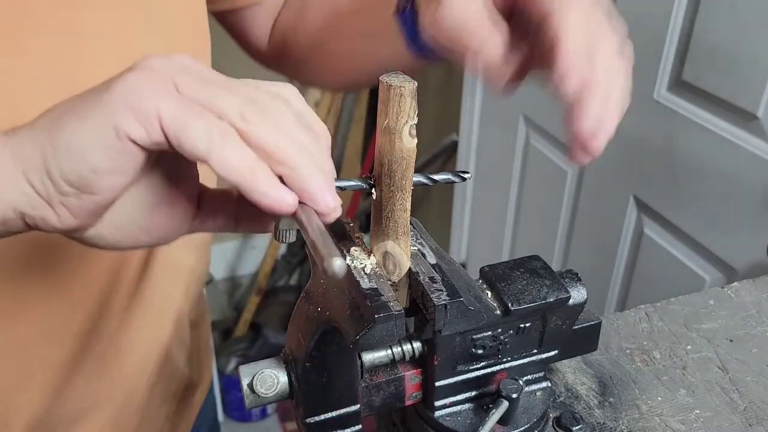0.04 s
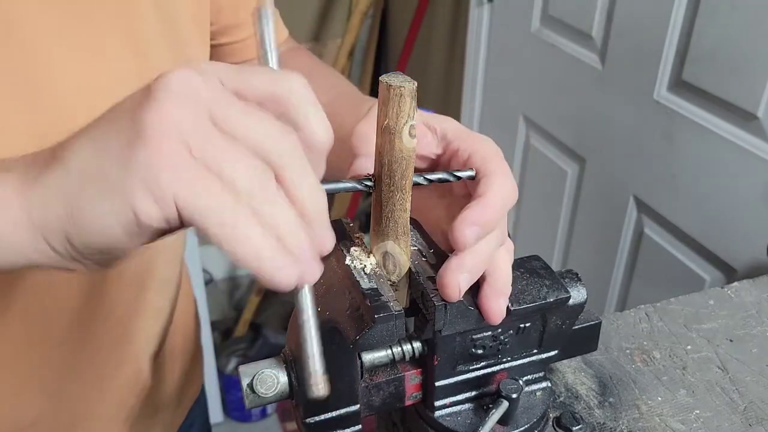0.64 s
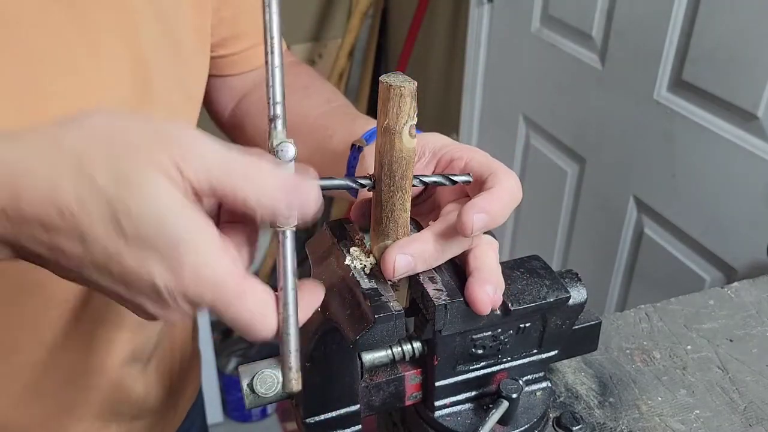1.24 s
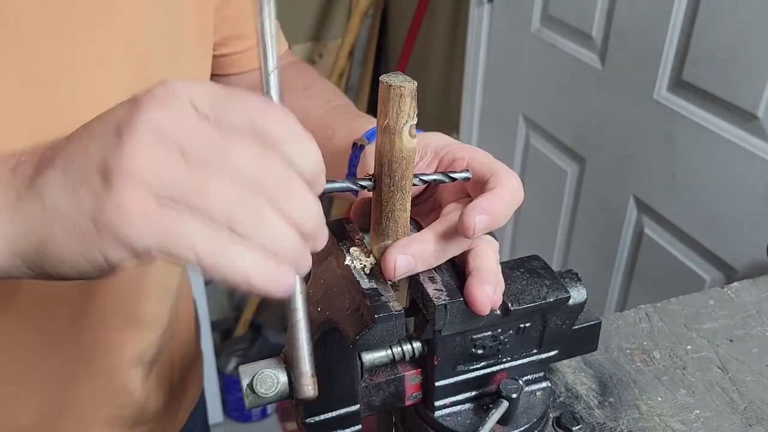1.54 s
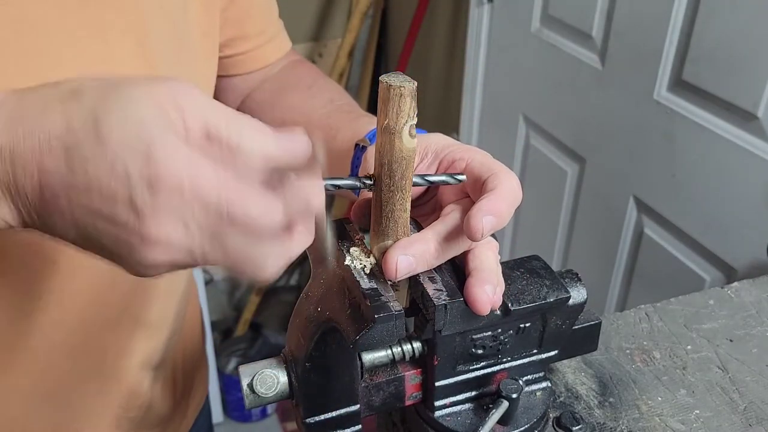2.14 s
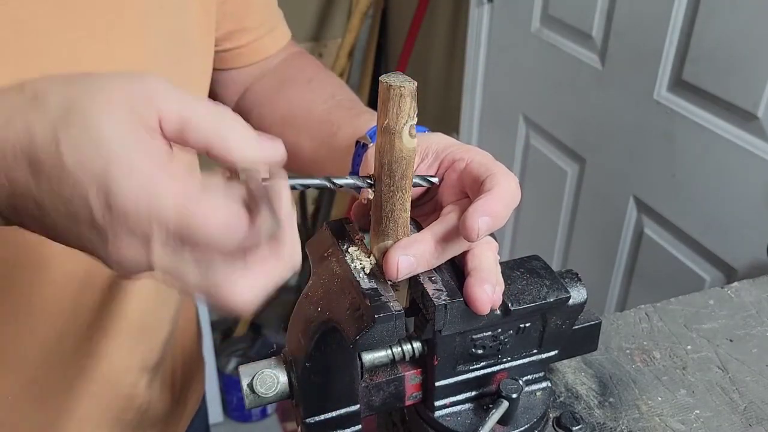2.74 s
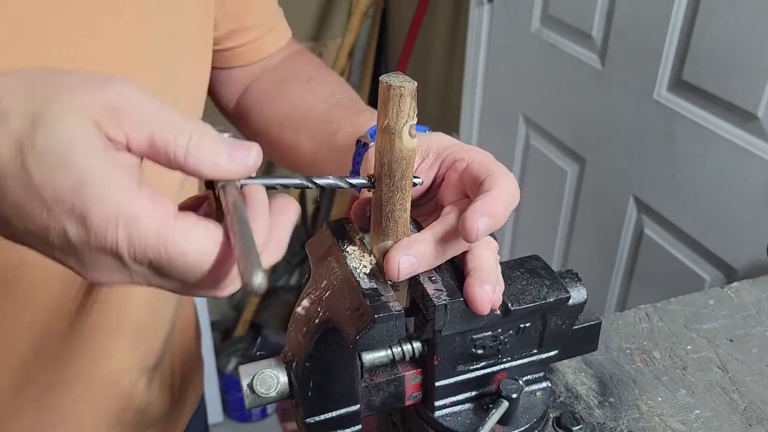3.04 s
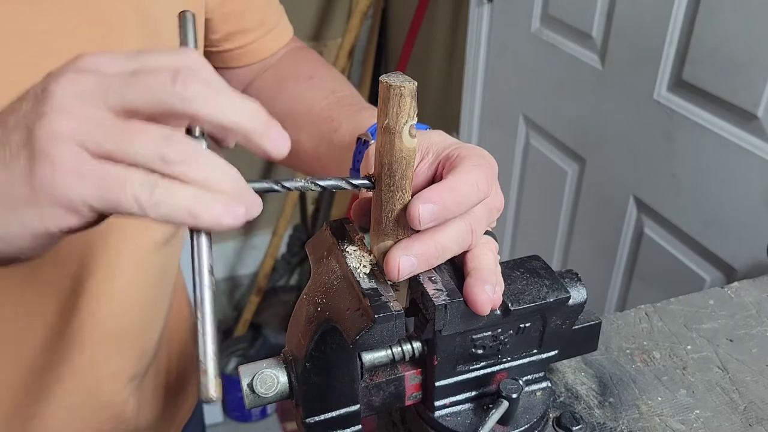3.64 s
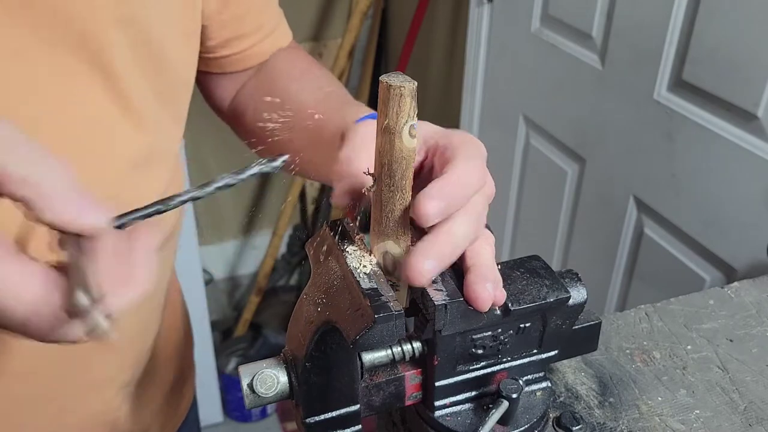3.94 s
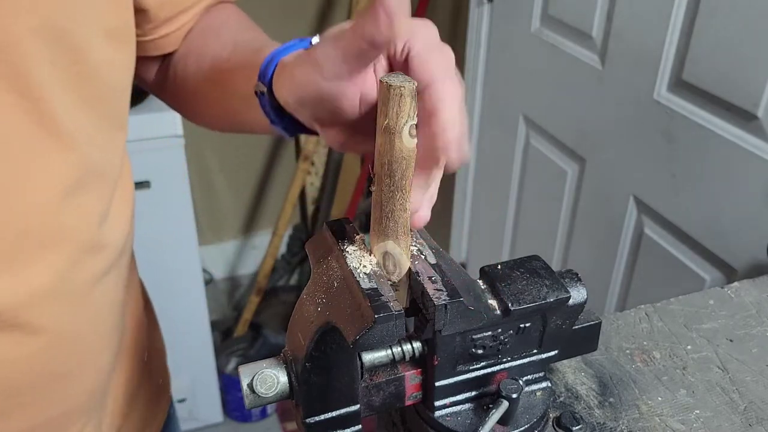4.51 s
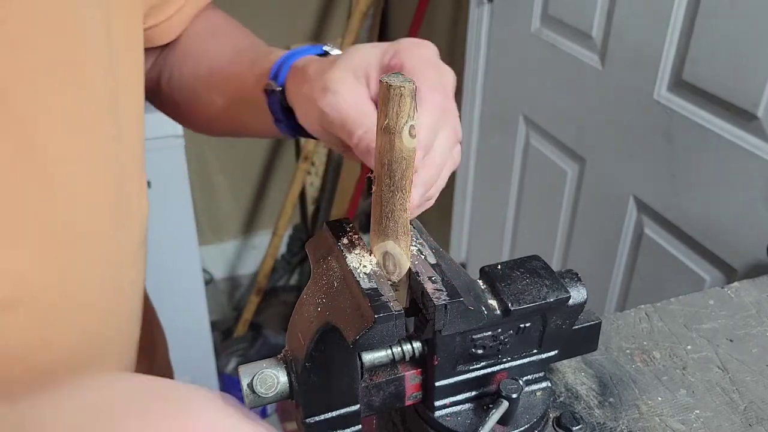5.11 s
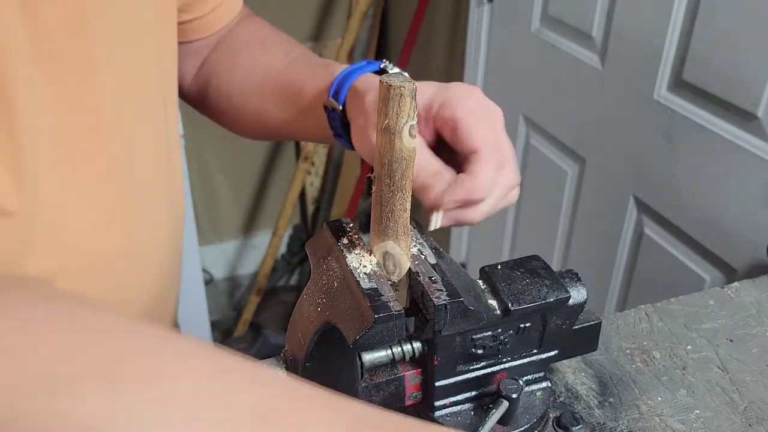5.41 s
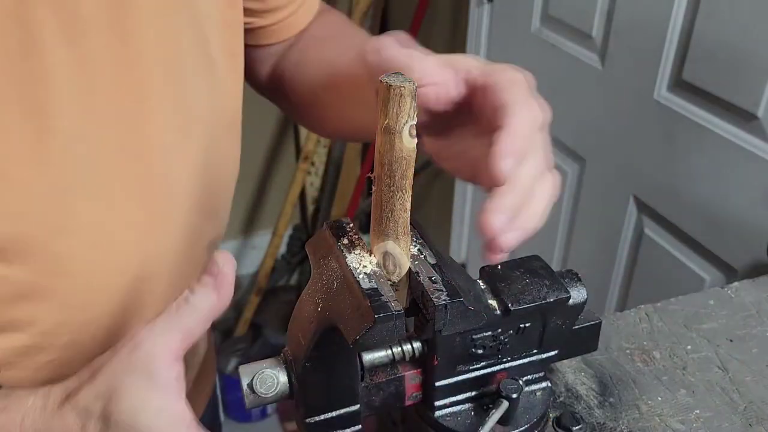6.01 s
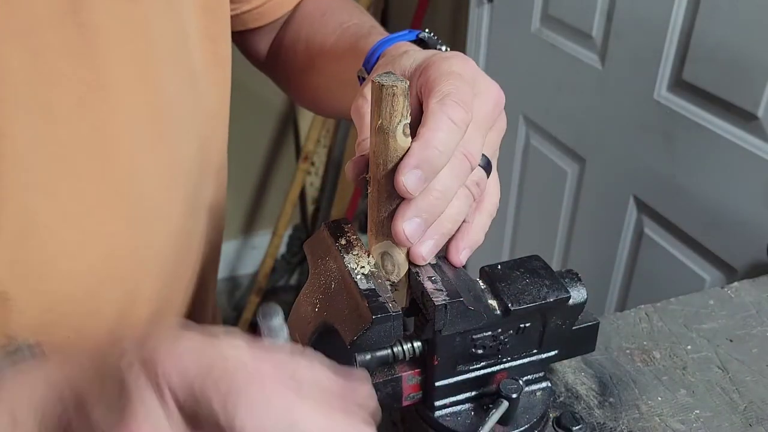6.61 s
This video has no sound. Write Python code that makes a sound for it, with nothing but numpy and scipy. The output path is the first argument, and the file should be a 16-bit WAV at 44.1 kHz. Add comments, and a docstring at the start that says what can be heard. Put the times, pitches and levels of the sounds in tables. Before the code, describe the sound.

Rhythmic gritty scrapes and short wooden groans of hand drilling, followed by small ticks, a loud clunk on a workbench and a metal clink.

```python
"""A twist bit turned by hand through a stick in a vise, close to a stereo pair in a small workshop.
At each turn the flutes scrape and snap fibres, and the bit sticks and slips so that the wood groans
and creaks. The bit slides out, chips tick and fingers brush off the dust. The steel tool is put down
on the bench with a knock that ducks the gain, then the bar of the vise drops with a clink.
Rustling hands, the low boom of the swaying bench and quiet room tone lie underneath."""
import sys
import numpy as np
from scipy import signal
from scipy.fft import rfft, irfft
from scipy.io import wavfile
from scipy.ndimage import uniform_filter1d

SR = 44100
rng = np.random.default_rng(int(sys.argv[2]) if len(sys.argv) > 2 else 0)


def materialize(psi):
    """Save the field psi as 16-bit PCM at rate SR to the path in sys.argv[1].

    A 1-D psi becomes a single channel; in a 2-D psi each row is a channel.
    """
    bounded = np.clip(np.atleast_2d(psi).T, -1, 1)
    quanta = np.round(bounded * 32767).astype(np.int16)
    wavfile.write(sys.argv[1], SR, quanta)


N = 298116
T = np.arange(N) / SR

# turns of the handle: t/s, half-length/s, scrape/dB, groan/dB, groan f/Hz, push on the bench/dB
TURNS = [(0.217, 0.023, -47.5, -35.5, 222.2, -25.5), (0.723, 0.018, -51, -38.5, 209.6, -27),
         (1.188, 0.019, -56, -33.5, 217.7, -26.5), (1.637, 0.017, -57, -33.5, 222, -29),
         (2.155, 0.014, -50.5, -31, 220, -56), (2.61, 0.022, -54.5, -36, 222.8, -60),
         (3.017, .023, -52.5, -42.5, 204.3, -44), (3.389, 0.019, -51, -41.5, 200, -68),
         (3.806, 0.026, -53, -41.5, 220, -48)]
# resonances of the steel bit and its handle: f/Hz, width/Hz, level/dB
BIT_MODES = [(3280, 120, 4), (3900, 63, 3), (5560, 340, 9.5), (10150, 220, 7.5)]
# spectrum of scraping flutes, also of other rubs and rattles: f/Hz, level/dB
SCRAPE_SPECTRUM = [(300, 8.5), (1500, 4.5), (2400, -9.5), (3400, -1.5), (5500, -5), (7200, -7.5),
                   (8600, -24.5), (10300, -20), (15500, -30)]
# spectrum of a dry snap: f/Hz, level/dB
SNAP_SPECTRUM = [(600, 1), (2200, 1), (3800, -0.5), (7000, -7), (9000, -15), (15500, -26)]


def amp(db):
    return 10 ** (np.asarray(db) / 20)


def unit(x):
    return x / np.sqrt(np.mean(x ** 2) + 1e-20)


def bins(x):
    return np.fft.rfftfreq(x.shape[-1], 1 / SR)


def curve_at(points, hz):
    """Reads rows of (f/Hz, value) on a log-frequency axis."""
    f, value = np.transpose(points)
    return np.interp(np.log(hz + 1), np.log(f), value)


def colour(x, spectrum):
    """Filters by rows of (f/Hz, level/dB)."""
    return irfft(rfft(x) * amp(curve_at(spectrum, bins(x))), x.shape[-1])


def pan(x, balance):
    """Leans each band towards the left or the right microphone."""
    lean = amp(curve_at(balance, bins(x)) * np.array([[.5], [-.5]]))
    return irfft(rfft(x) * lean / np.sqrt(np.mean(lean ** 2, 0)), x.shape[-1])


def add(mix, start_s, sound):
    part = mix[:, round(start_s * SR):][:, :sound.shape[-1]]
    part += sound[..., :part.shape[-1]]


def noise(size):
    """A diffuse field, only weakly alike at the two microphones."""
    # likeness of left and right: f/Hz, correlation
    likeness = [(60, -0.34), (200, 0.22), (1200, -0.51), (6000, 0.0035)]
    white = rng.standard_normal((2, size))
    left, other = rfft(white)
    alike = curve_at(likeness, bins(white))
    return irfft(np.array([left, alike * left + np.sqrt(1 - alike ** 2) * other]), size)


def resonate(x, modes):
    """Parallel resonances, one for each row (f/Hz, width/Hz, level/dB)."""
    return sum(amp(db) * signal.lfilter(*signal.iirpeak(hz, hz / width, SR), x)
               for hz, width, db in modes)


def ring(modes, spread_hz):
    """One second of free ringing; up to spread_hz, higher modes reach the pair further out of step."""
    t, phase = T[:SR], np.array([[-1], [1]]) * np.pi / 4
    return sum(amp(db - 60 * t / t60) * np.sin(2 * np.pi * hz * t + min(hz / spread_hz, 1) * phase)
               for hz, db, t60 in modes)


def die_away(x, stretch=1):
    """Each band fades over the decay time of the workshop, times stretch."""
    # decay of the workshop: f/Hz, t60/s
    decay_times = [(80, 0.69), (600, 0.35), (8000, 0.26), (15000, 0.087)]
    hz, t, bands = signal.stft(x, SR, nperseg=256)
    t60 = stretch * curve_at(decay_times, hz)[:, None]
    return signal.istft(bands * amp(-60 * t / t60), SR)[1][:, :x.shape[-1]]


def room(x, wet_db):
    """Adds the short tail from the near walls."""
    tail = die_away(noise(SR), stretch=0.64) * np.minimum(T[:SR] / 0.00055, 1)
    return x + amp(wet_db) * signal.fftconvolve(x, tail / np.linalg.norm(tail[0]), axes=1)[:, :N]


def wander(hz):
    """Random drift of unit size, slower than about hz."""
    return unit(irfft(rfft(rng.standard_normal(N)) * np.exp(-(bins(T) / hz) ** 2), N))


def swells(rows, shape=2):
    """A swell for each row (t/s, half-length/s, level/dB): shape 2 is a bell, 1 a cusp."""
    t = T[::20]
    power = sum(amp(db) ** 2 * np.exp(-np.minimum(abs((t - s) / half) ** shape, 60))
                for s, half, db in rows)
    return np.interp(T, t, np.sqrt(power))


def judder(hz, jitter, pace_hz):
    """A stick-slip swing whose pitch wanders."""
    return np.sqrt(2) * np.sin(2 * np.pi * np.cumsum(hz * (1 + jitter * wander(pace_hz))) / SR)


def slips(per_s, spread_db):
    """Fibres catching and letting go: random impulses, a few of them large."""
    sizes = amp(spread_db * np.minimum(rng.exponential(1, N), 4)) * (rng.random(N) < per_s / SR)
    return unit(sizes * rng.standard_normal((2, N)))


def soften(x, hz):
    """A soft contact loses the treble."""
    return signal.lfilter(*signal.butter(2, hz, fs=SR), x)


def regrips(db):
    """Rows for swells: the hand takes a new grip halfway between two turns."""
    times = np.transpose(TURNS)[0]
    return [(s, 0.27, db) for s in (times[:-1] + times[1:]) / 2]


def room_tone():
    """The steady air of the workshop, its bass to the right."""
    # spectrum of the air: f/Hz, level/dB
    spectrum = [(25, -12.5), (75, 0.5), (270, -11.5), (350, -1), (430, -21), (750, -10.5), (1000, -20),
                (1960, -21), (2800, -30.5), (6700, -37), (8600, -52.5), (16000, -55.5)]
    # its balance at the pair: f/Hz, left minus right/dB
    balance = [(60, -17), (500, -1.5), (5000, 0.5)]
    return pan(amp(-48.5) * unit(colour(noise(N), spectrum)), balance)


def hands():
    """Skin and cloth rub softly, more at each new grip."""
    # spectrum of hands and shirt: f/Hz, level/dB
    rustle = [(30, 4.5), (110, 9), (210, 11), (290, -7), (480, -0.5), (780, -4), (1100, -31), (4000, -27.5),
              (15000, -83)]
    # a hand goes for the vise: t/s, half-length/s, level/dB
    reach = (6.66, 0.11, -44.5)
    level = np.hypot(amp(-52), swells(regrips(db=-51) + [reach]))
    return unit(colour(noise(N), rustle)) * level * amp(4 * wander(38))


def bench_sway():
    """The bench booms and rumbles low, swelling with each turn, grip and nudge, the dropped tool and the later
    blows."""
    # fingers nudge the stick, and the bench booms after the late blows at 6.33 and 6.58 s: t/s, half-length/s,
    # level/dB
    nudges = [(0.888, 0.022, -29), (2.773, 0.071, -35.5), (3.999, 0.036, -34), (4.84, 0.039, -33.5),
              (4.992, 0.039, -36), (6.475, 0.059, -33), (6.67, 0.068, -35)]
    # sway under the dropped tool: t/s, half-length/s, level/dB
    drop = (5.86, 0.1, -19)
    pushes = [(s + 4.25 * half, 3.2 * half, db) for s, half, *_, db in TURNS]
    level = np.hypot(swells(pushes + [drop] + regrips(db=-44) + nudges), amp(-51.5))
    rumble = unit(colour(noise(N), [(45, -14), (75, -1), (130, -14.5), (900, -96.5)]))
    return level * (judder(74.5, jitter=0.069, pace_hz=22.2) + amp(-6) * rumble)


def fibre_snaps():
    """A fibre caught by a flute breaks all at once, in a gritty burst that rings the bit."""
    # caught fibres: t/s, level/dB
    catches = [(0.1756, -46), (0.2036, -41.5), (0.709, -47), (0.726, -45), (1.187, -51), (1.6274, -59),
               (1.8526, -47), (2.1508, -39), (2.167, -46), (2.5905, -46), (3.0052, -54), (3.0267, -43),
               (3.3619, -46), (3.3889, -44.5), (3.7892, -41.5), (3.8252, -44.5)]
    breaks, decay_s = np.zeros(N), 0.0042
    for s, db in catches:
        breaks[round(s * SR)] = amp(db)
    bursts = signal.lfilter([1], [1, -np.exp(-1 / (decay_s * SR))], breaks)
    grit = unit(colour(slips(per_s=6000, spread_db=1), SNAP_SPECTRUM))
    return unit(grit + resonate(grit, BIT_MODES)) * bursts


def fibre_crackle():
    """Each fibre that breaks pings briefly at one of many pitches."""
    pitches_hz, width_hz = np.geomspace(2600, 14000, 18), 330
    fibres = slips(per_s=1200, spread_db=3.5)
    which = rng.integers(0, len(pitches_hz), N)
    return unit(sum(resonate(fibres * (which == k), [(hz, width_hz, 0)])
                    for k, hz in enumerate(pitches_hz)))


def flute_scrape():
    """At each turn the flutes tear fibres in the hole, and the steel rings with them."""
    times, half, scrape_db, *_ = np.transpose(TURNS)
    fibres = unit(colour(fibre_crackle() + .7 * slips(per_s=700, spread_db=2.5), SCRAPE_SPECTRUM))
    # the point of contact travels along the flutes, so the modes of the bit speak by turns
    steel = sum(resonate(fibres, [mode]) * amp(4 * wander(45) + 3 * wander(4)) for mode in BIT_MODES)
    return (fibres + 0.44 * unit(steel)) * swells(zip(times, 0.98 * half, scrape_db), shape=1)


def stick_groan():
    """The bit sticks and slips at each turn, and the stick groans at the rate of the slips."""
    # low resonances of the stick: f/Hz, width/Hz, level/dB
    modes = [(216, 14.5, 3), (347.5, 37, 9.2)]
    times, half, _, groan_db, groan_hz, _ = np.transpose(TURNS)
    tone = judder(np.interp(T, times, groan_hz), jitter=0.0369, pace_hz=42.7)
    groan = unit(tone + 0.43 * unit(resonate(noise(N), modes)))
    onset_s, rise_s = times - 0.2 * half, 0.98 * half
    age = np.maximum((T[:, None] - onset_s) / rise_s, 0)
    level = (age * np.exp(1 - np.minimum(age, 40))) @ amp(groan_db)
    return room(groan * level, wet_db=-10)


def hole_creaks():
    """The wall of the hole creaks: a wavering tone over one small, uneven knock at each slip."""
    # creaks: t/s, level/dB, f/Hz
    creaks = [(0.255, -42, 933), (0.751, -43.5, 905), (1.202, -47, 905), (1.65, -45.5, 910),
              (2.174, -44, 974), (2.65, -47, 819), (3.039, -48.5, 847.4), (3.887, -43, 715)]
    # resonances of the stick as the bit drags in it: f/Hz, width/Hz, level/dB
    modes = [(679, 71, 2.5), (925, 195, 1.5), (1354, 123, -1.5)]
    turn_times, *_, groan_hz, _ = np.transpose(TURNS)
    slip_hz = np.interp(T, turn_times, groan_hz) * (1 + 0.06 * wander(150))
    slip_count = np.floor(np.cumsum(slip_hz) / SR)
    chatter = np.diff(slip_count, prepend=0) * (1 + .5 * rng.standard_normal((2, N)))
    hollow = unit(resonate(resonate(chatter, modes), modes))
    times, _, creak_hz = np.transpose(creaks)
    tone = judder(np.interp(T, times, creak_hz), jitter=0.04025, pace_hz=153.5)
    level = swells([(s, 0.017, db) for s, db, _ in creaks])
    return room(unit(hollow + 1.43 * tone) * level, wet_db=-9)


def loose_bit():
    """The bit spins on lightly between turns and at last slides out, rasping at a mode of the steel."""
    # spins: t/s, half-length/s, level/dB, ring f/Hz
    spins = [(1.91, .06, -58, 5470), (2.42, 0.047, -53, 4030), (2.83, 0.072, -56, 4077),
             (3.185, 0.045, -54, 3920), (3.59, 0.039, -55.5, 4110), (3.89, 0.028, -51, 3920)]
    out, width_hz = np.zeros((2, N + SR)), 350
    t = T[:SR] - .5  # each rasp peaks in the middle of its second
    for s, half, db, hz in spins:
        drag = noise(SR)
        steel = unit(resonate(drag, [(hz, width_hz, 0)]))
        rasp = unit(unit(colour(drag, SCRAPE_SPECTRUM)) + amp(-9) * steel)
        add(out, s, amp(db) * rasp * np.exp(-abs(t / half) ** 1.5 / 2))
    return out[:, SR // 2:][:, :N] * amp(1.5 * wander(50))


def chip_ticks():
    """A chip breaks with a short, bright crackle and the steel rings for an instant."""
    # ticks: t/s, level/dB, ring f/Hz
    ticks = [(2.836, -44, 4200), (3.862, -47, 3900), (4.142, -45, 4470), (4.853, -41.5, 5330),
             (4.859, -35, 3830), (5.158, -48, 5150), (5.197, -39, 4860), (5.326, -45.5, 4820),
             (5.375, -42, 3900)]
    out, t = np.zeros((2, N)), T[:SR // 8]
    for s, db, hz in ticks:
        snap = unit(np.diff(colour(noise(len(t) + 1), SNAP_SPECTRUM))) * np.exp(-t / 0.0011)
        steel = ring([(hz, -5, .03)], spread_hz=900)[:, :len(t)]
        add(out, s, amp(db) * (snap + steel))
    return room(out, wet_db=-3.4)


def vise_jolts():
    """The vise thumps as the bit lets go, a finger knocks and the bar drops."""
    # jolts: t/s, level/dB
    jolts = [(3.878, -25), (5.377, -33.5), (6.299, -13.5)]
    # modes of the vise: f/Hz, level/dB, t60/s
    modes = [(115.7, -4, 0.21), (150.2, -3, 0.14), (201.2, 0.5, 0.12)]
    out = np.zeros((2, N))
    thump = ring(modes, spread_hz=1000) * (1 - np.exp(-T[:SR] / 0.0031))
    for s, db in jolts:
        add(out, s, amp(db) * thump)
    return room(out, wet_db=-4)


def dust_brushing():
    """Fingers brush the dust off the stick: skin drags on wood as a plain hiss."""
    # strokes: t/s, half-length/s, level/dB
    strokes = [(4.495, 0.065, -54), (4.87, 0.045, -56), (5.28, 0.4, -61)]
    return unit(colour(slips(per_s=3000, spread_db=0.5), SCRAPE_SPECTRUM)) * swells(strokes)


def bench_knocks():
    """Each blow clunks, thuds and rings the bench top; the tool skids dully before it drops."""
    # blows and bounces: t/s, level/dB, treble cutoff f/Hz
    blows = [(5.441, -22.5, 1380), (5.456, -16.5, 425), (5.547, -13.5, 2450), (5.571, -14, 548),
             (5.7198, -1, 1298), (5.731, -4.5, 704.6), (5.757, -14.5, 1010), (5.789, -10.5, 630),
             (6.334, -18.5, 565), (6.583, -34.5, 3720)]
    # modes of the bench top: f/Hz, level/dB, t60/s
    top_modes = [(164.8, -5.5, 0.44), (203.8, 0, 0.51), (350.2, -3.5, 0.23), (413, -0.5, 0.13),
                 (527, -5, 0.21), (619, -7.5, 0.21), (790, -12.5, 0.21), (1010, -11.5, 0.36)]
    # hollow clunk of steel on the top: f/Hz, level/dB, t60/s
    clunk_modes = [(475, -2, 0.11), (685, -8.5, 0.08), (800, -7.5, 0.052)]
    # spectrum of the thud and the skid: f/Hz, level/dB
    spectrum = [(40, -15.5), (195, -4), (450, -4), (800, -10), (1150, -15.5), (1700, -24.5), (3000, -20),
                (7600, -27.5), (9000, -39.5), (15500, -38)]
    out = np.zeros((2, N))
    top, clunk = ring(top_modes, spread_hz=670), ring(clunk_modes, spread_hz=870)
    for s, db, cutoff_hz in blows:
        thud = die_away(unit(colour(noise(SR), spectrum))) * (1 + np.exp(-T[:SR] / 0.005))
        # hard blows clunk far more than soft ones
        blow = amp(0.8 * db) * clunk + amp(-11.5) * top + amp(-11) * thud
        add(out, s, amp(db) * soften(blow, cutoff_hz))
    skid = soften(unit(colour(noise(N), spectrum)), hz=496) * swells([(5.65, 0.1, -25.5)])
    return out + skid


def tool_clatter():
    """Where bare steel strikes the bench, the tool rings and its loose handle clatters."""
    # strikes: t/s, level/dB
    strikes = [(5.547, -35), (5.72, -30)]
    # modes of the steel tool: f/Hz, level/dB, t60/s
    modes = [(1240, -1, 0.22), (1355, -3.5, 0.31), (1452, -11.5, 0.17), (1910, -6, 0.27)]
    out, steel = np.zeros((2, N)), ring(modes, spread_hz=1300)
    for s, db in strikes:
        clatter = die_away(unit(colour(noise(SR), SCRAPE_SPECTRUM)))
        add(out, s, amp(db) * (steel + amp(-7) * clatter))
    return out


def bar_clink():
    """The sliding bar of the vise drops against its stop, with a crack and a ring."""
    # hits on the stop: t/s, level/dB
    clinks = [(6.317, -38), (6.325, -43.5)]
    # modes of the bar: f/Hz, level/dB, t60/s
    modes = [(668, 7, .18), (2864, -4, .1), (4000, -4, .06), (6428, -3, .12), (7700, 0, .08),
             (14900, -12, .08)]
    out, steel = np.zeros((2, N)), ring(modes, spread_hz=900)
    for s, db in clinks:
        crack = unit(colour(noise(SR), SNAP_SPECTRUM)) * np.exp(-T[:SR] / 0.0071)
        add(out, s, amp(db) * (.5 * steel + 1.27 * crack))
    return room(out, wet_db=0.66)


def standing_waves(x):
    """The low resonances of the workshop reach the two microphones in opposite phase."""
    # room modes: f/Hz, width/Hz, level/dB
    modes = [(220, 20, -11.5), (345, 13, -1)]
    return x + np.array([[1], [-1]]) * signal.hilbert(resonate(x.mean(0), modes)).imag


def scene():
    """Vise and bench as the pair hears them, bass to the right and treble to the left."""
    # balance of sounds at the vise: f/Hz, left minus right/dB
    vise_side = [(200, -10.5), (380, -3), (800, -1), (4400, 4.5)]
    # balance of sounds on the bench: f/Hz, left minus right/dB
    bench_side = [(190, -7.5), (330, 0), (600, -5), (1200, 4.5)]
    air = room_tone()
    drilling = room(flute_scrape() + fibre_snaps(), wet_db=-7) + stick_groan() + hole_creaks()
    handling = hands() + bench_sway() + dust_brushing()
    at_vise = drilling + handling + loose_bit() + chip_ticks() + vise_jolts() + bar_clink()
    on_bench = bench_knocks() + tool_clatter()
    return standing_waves(pan(at_vise, vise_side) + pan(on_bench, bench_side)) + air


def record(dry):
    """The recorder's gain ducks after the loud knock and recovers; peaks round off; top treble is cut."""
    threshold_db, duck_share, attack_s, recover_db_per_s = -18, 0.4, 0.2, 15
    power_db = 10 * np.log10(abs(uniform_filter1d((dry ** 2).mean(0), size=1000)) + 1e-12)
    fall_db = recover_db_per_s * T
    held_db = np.maximum.accumulate(power_db + fall_db) - fall_db
    over_db = np.maximum(held_db - threshold_db, 0)
    pole = np.exp(-1 / (attack_s * SR))
    ducked = dry / amp(duck_share * signal.lfilter([1 - pole], [1, -pole], over_db))
    rounded = ducked / (1 + ducked ** 6) ** (1 / 6)
    lowpass = signal.firwin(511, 15900, window=("kaiser", 9), fs=SR)
    return signal.oaconvolve(rounded, lowpass[None], "same")


dry = scene()
out = record(dry)
materialize(out)
```